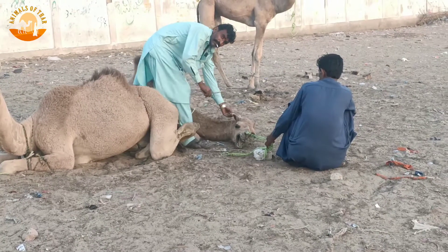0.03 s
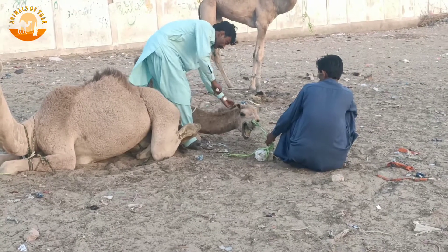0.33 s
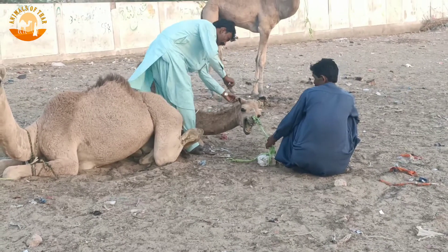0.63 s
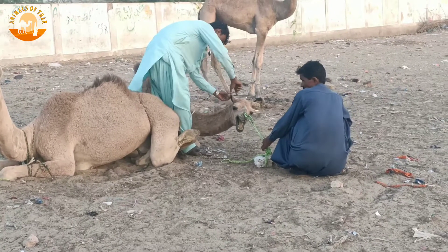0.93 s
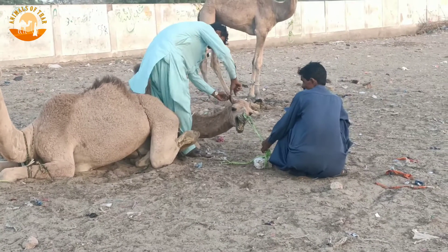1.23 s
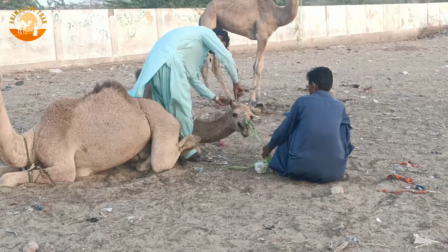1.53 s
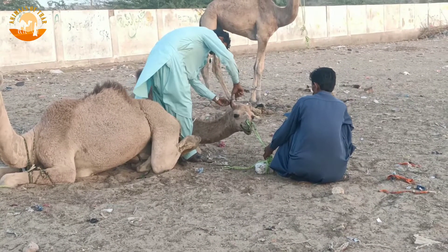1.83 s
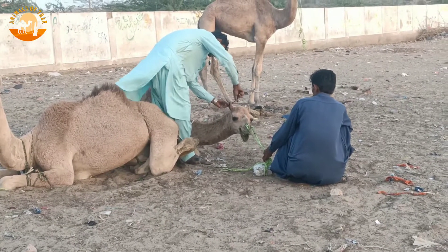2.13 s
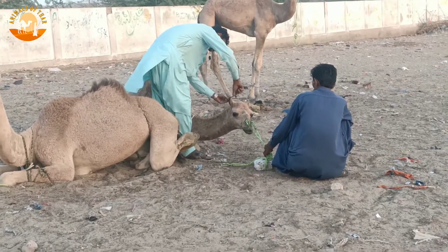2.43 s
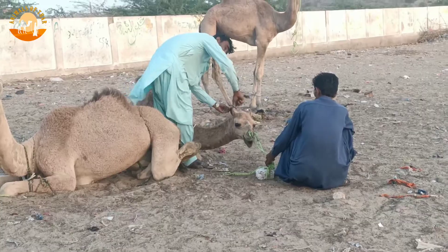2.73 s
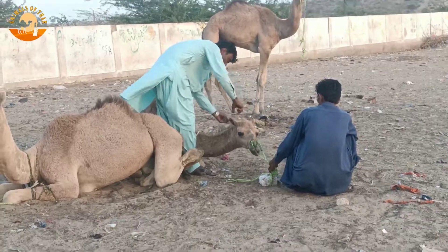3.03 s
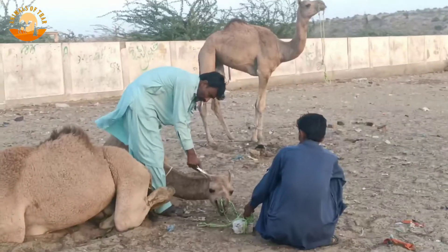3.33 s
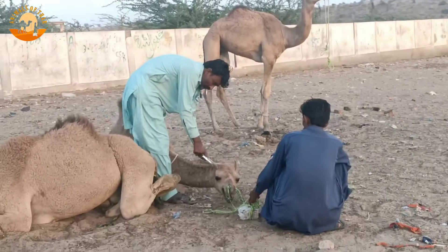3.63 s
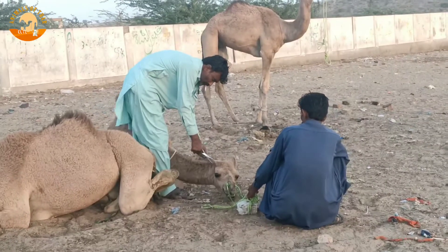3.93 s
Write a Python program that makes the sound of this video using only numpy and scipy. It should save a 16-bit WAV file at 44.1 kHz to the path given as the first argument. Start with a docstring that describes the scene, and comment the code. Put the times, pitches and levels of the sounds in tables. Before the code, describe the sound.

A camel gives one long, hoarse, wet bellow while wind rumbles on the microphone.

```python
"""A dusty yard, a camel held down near the microphone, wind buffeting it from start to finish.
The camel opens one long bellow: flaps of throat tissue drive a wet, ragged roar through the open mouth,
with saliva popping in it. The roar narrows to a groan, locks into an even flutter and roughens again.
A cut ends the bellow abruptly, with a sharp edit click. A faint rattle follows, then birds chirp far off.
Nearly all of the sound is in the right channel."""
import sys
import numpy as np
from scipy import signal
from scipy.fft import rfft, irfft
from scipy.io import wavfile
from scipy.ndimage import uniform_filter1d

SR = 44100
rng = np.random.default_rng(int(sys.argv[2]) if len(sys.argv) > 2 else 0)


def store_wav(level_fs):
    """Save 16-bit WAV to argv[1]."""
    pcm = np.round(np.clip(np.atleast_2d(level_fs), -1, 1) * 32767)
    wavfile.write(sys.argv[1], SR, pcm.T.astype(np.int16))


N = 176400
T = np.arange(N) / SR
START_S, ROAR_S, GROAN_S, LOCK_S, UNLOCK_S, CUT_S = 0.1546, 0.68, 1.68, 2.08, 2.89, 3.141
RING_MULTIPLE = 6   # cycles of the lowest throat ring per flap while locked


# The camel's throat, close by. Each row: time in seconds, flaps per second when not locked, timing
# scatter as a share of a period, strength scatter in dB, rasp from 0 to 1.
THROAT_FLUTTER = [(.15, 70, .35, 0.5, 0.8), (.4, 55.8, .3, 1.5, 0.68), (.9, 76, .25, 2, .9),
                  (1.3, 85, .22, 0.5, 1), (1.6, 74.4, .14, -1, 0.75), (2.0, 68, .22, 0.5, 0.5),
                  (2.11, 52, .014, 1, 0.6), (2.35, 53, 0.0079, 0, 0.5), (2.55, 53.7, .006, 2, 0.57),
                  (2.85, 57.7, .012, 1.5, 0.43), (2.93, 72, .22, -0.5, 0.56), (3.14, 81, 0.17, 1, 0.99)]
def bellow():
    """Flaps of the throat and their puffs of air excite the mouth, the nose and two throat rings."""
    rate, scatter, scatter_db, rasp = in_time(THROAT_FLUTTER)
    ring_hz = in_time(LOW_RING)[0]
    lock = ramp(LOCK_S, 0.08) * (1 - ramp(UNLOCK_S, 0.08))
    flaps = pulses(rate + lock * (ring_hz / RING_MULTIPLE - rate), scatter, scatter_db)
    turns = np.cumsum(ring_hz + 14 * scatter * drift(25)) / SR   # ragged flutter makes the ring waver
    buzz = rms_one(np.diff(np.floor(turns), prepend=0))
    wet = slaps()
    air = puffs(flaps, decay_s=0.0045) + from_db(-4) * rng.standard_normal(N)   # puffs and a steady leak
    drive = np.sqrt(1 - rasp) * rms_one(flaps) + np.sqrt(rasp) * air + from_db(-9) * buzz
    drive = drive / loudness(drive) + wet
    crackle = saliva_crackle()
    breathy = drive + from_db(-1.5) * rng.standard_normal(N)
    voice = nasal_notch(mouth(drive, breathy, crackle, spit=air + 2 * wet, lock=lock))
    voice += bark(breathy) + squeak(breathy) + nasal_swell(drive)
    voice += low_ring(breathy, turns, scatter) + second_ring(breathy) + lock * hum(turns)
    return voice * ramp(START_S, 0.01) * (1 - ramp(CUT_S, 0.00093))


# Throat and mouth in three postures. Each row: resonance in Hz, width in Hz, relative gain in dB.
GAPE_RESONANCES = [(545, 142, 11.5), (835, 114, 9.5), (1082, 203, 8.5), (1360, 330, 1), (1830, 140, -7),
                   (2130, 160, -10.5), (2630, 340, -11.5), (3200, 420, -14.5), (3780, 320, -13.5),
                   (4310, 270, -18.5), (5300, 110, -21.5), (6140, 420, -24), (7300, 810, -34.5)]
ROAR_RESONANCES = [(383, 53, 6), (687, 290, -3.5), (1014, 290, -6), (1335, 178, 2.5), (1572, 73, -3),
                   (2036, 350, 3), (2420, 174, -4), (2630, 430, -2.5), (3250, 232, 0), (3830, 176, -13),
                   (4310, 730, -25), (5460, 270, -21), (6240, 400, -24.5), (7060, 1250, -30.5)]
GROAN_RESONANCES = [(748, 112, 1), (940, 280, -13.5), (1356, 102, 2.5), (1571.7, 156, -8), (2100, 148, 1.5),
                    (2382, 134, -2), (2752, 254, -6.5), (3230, 214, -12), (3720, 110, -22),
                    (4220, 160, -19), (5176, 150, -30.5), (6120, 820, -38), (7105, 340, -30)]
# The camel's effort. Each row: time in seconds, relative dB of the lower and of the upper resonances.
BELLOW_EFFORT = [(0.14, -23.5, -79), (0.16, -39.5, -55.5), (0.2, -40, -59), (0.21, -30, -50.5),
                 (0.26, -32.5, -51), (0.45, -33, -51), (0.55, -34.5, -44.5), (0.64, -33, -42.5),
                 (0.79, -36.5, -43.5), (1.0, -32.5, -38.5), (1.26, -32, -38.5), (1.67, -34, -40),
                 (1.83, -42, -46.5), (1.85, -34, -37.5), (1.86, -38, -42.5), (1.94, -37, -41.5),
                 (2.15, -38, -46.5), (2.8, -36.5, -45), (3.13, -41.5, -47)]
def mouth(drive, breathy, crackle, spit, lock, split_hz=1750):
    """The mouth passes from gape to roar to groan; crackle and fine spit stop as it narrows."""
    lower_db, upper_db = in_time(BELLOW_EFFORT)
    roar, groan = ramp(ROAR_S, 0.32), ramp(GROAN_S, 0.16)
    gritty = drive + from_db(-8) * crackle * (1 - groan)
    postures = (GAPE_RESONANCES, 1 - roar), (ROAR_RESONANCES, roar * (1 - groan)), (GROAN_RESONANCES, groan)
    lower = upper = 0
    for rows, share in postures:
        lower += np.sqrt(share) * resonate(breathy, [r for r in rows if r[0] <= split_hz])
        upper += np.sqrt(share) * resonate(gritty, [r for r in rows if r[0] > split_hz])
    lower = from_db(lower_db - 2.5 - 5.5 * lock) * lower / loudness(lower)   # softer while locked
    upper = from_db(upper_db + 2) * upper / loudness(upper)
    sizzle = from_db(upper_db - 36) * (1 - groan) * band(spit, 8900, 16000)
    return lower + upper + sizzle


# The lowest throat resonance. Each row: time in seconds, centre in Hz, clean and rough levels in dB.
LOW_RING = [(.2, 289.8, -73, -49), (.72, 288.5, -43.5, -66), (.8, 287.5, -34, -43),
            (.93, 288.5, -34.5, -47.5), (1.0, 276.1, -37.5, -43), (1.12, 283.9, -36.5, -37),
            (1.17, 331.4, -37, -42.5), (1.23, 320.4, -32.5, -45), (1.42, 298.7, -31.5, -38.5),
            (1.66, 298.2, -34.5, -35), (1.77, 324.4, -65.5, -32), (1.95, 317.5, -35, -33.5),
            (2.09, 328.6, -28.5, -35.5), (2.16, 328.3, -33.5, -49), (2.33, 328.3, -30.5, -40),
            (2.48, 321.7, -26.5, -55.5), (2.66, 323.4, -27, -44), (2.86, 319.2, -28.5, -48),
            (2.93, 315.5, -39, -34.5), (3.14, 306.4, -40, -35)]
def low_ring(drive, turns, scatter):
    """The throat booms: a rough band around a clean tone that flickers as the flutter grows ragged."""
    _, clean_db, rough_db = in_time(LOW_RING)
    flicker_db = 3 * scatter * drift(32)
    clean = from_db(clean_db + flicker_db) * np.sqrt(2) * np.sin(2 * np.pi * turns)
    return clean + from_db(rough_db) * gliding(drive, turns, width_hz=83)


# The throat's second ring. Each row: time in seconds, centre in Hz, level in dB.
HIGH_RING = [(1.12, 710, -61), (1.25, 712, -35.5), (1.4, 706, -43.5), (1.52, 733, -41.5), (1.72, 738, -45),
             (1.85, 714, -41), (1.95, 698, -46.5), (2.03, 737, -43), (2.13, 760, -46), (2.85, 750, -63),
             (2.95, 758, -55), (3.14, 755, -45.5)]
def second_ring(drive):
    """A narrow throat resonance rings a little over an octave above the boom."""
    hz, db = in_time(HIGH_RING)
    return from_db(db) * gliding(drive, np.cumsum(hz) / SR, width_hz=30.6)


# The hum in the groan. Each row: multiple of the flutter rate, relative level in dB.
HUM_HARMONICS = [(4, -18.5), (5, -30), (7, -20.5), (8, -27), (9, -49), (10, -26), (11, -44), (12, -23),
                 (13, -23.5), (14, -25), (15, -42.5), (16, -22), (17, -31), (18, -25.5), (19, -30),
                 (21, -41), (22, -29), (23, -30.5), (24, -39), (25, -19.5), (26, -25.5), (27, -36),
                 (28, -27.5), (29, -37), (30, -42.5)]
def hum(turns):
    """Locked to the ring, the flutter gives clean harmonics on either side of it."""
    phases = rng.random(len(HUM_HARMONICS))
    tones = sum(from_db(db) * np.sin(2 * np.pi * (k * turns / RING_MULTIPLE + phase))
                for (k, db), phase in zip(HUM_HARMONICS, phases))
    return from_db(-42) * rms_one(tones)


# The opening bark. Each row: time in seconds, centre in Hz, level in dB.
BARK_GLIDE = [(.2, 2280, -53), (.213, 2070, -40), (.232, 2010, -41), (.245, 1900, -47), (.265, 1460, -51),
              (.3, 1454, -38.5), (.45, 1300, -62)]
def bark(drive):
    """A resonance falls as the jaw drops."""
    hz, db = in_time(BARK_GLIDE)
    return from_db(db) * gliding(drive, np.cumsum(hz) / SR, width_hz=330)


def squeak(drive, hz=4400, end_s=0.202):
    """The tight throat squeaks as the call starts."""
    return from_db(-58.5) * (1 - ramp(end_s, 0.018)) * gliding(drive, hz * T, width_hz=320)


# The notch cut by the nose. Each row: time in seconds, centre in Hz.
NASAL_NOTCH = [(.2, 1530), (.75, 1645), (1.62, 1650), (1.74, 1820), (3.14, 1830)]
def nasal_notch(voice, width_hz=130):
    """The nasal passage absorbs a narrow, moving band."""
    hz, = in_time(NASAL_NOTCH)
    carrier = np.exp(2j * np.pi * np.cumsum(hz) / SR)
    highpass = signal.butter(2, width_hz / 2, "high", fs=SR, output="sos")
    return (signal.sosfilt(highpass, signal.hilbert(voice) / carrier) * carrier).real


# The nose. Each row: resonance in Hz, width in Hz, relative gain in dB.
NASAL_RESONANCES = [(2150, 170, -3.5), (2396, 130, 1), (4380, 110, -19.5), (5214, 120, -22.5)]
def nasal_swell(drive, db_per_s=28.5):
    """Nasal resonances swell towards the end of the bellow."""
    nasal = resonate(drive, NASAL_RESONANCES)
    return from_db(-40 - db_per_s * np.abs(CUT_S - T)) * nasal / loudness(nasal)


# Hard wet slaps in the throat. Each row: start in seconds, relative strength in dB.
THROAT_SLAPS = [(0.231, -27), (.371, -40), (0.427, -27), (0.4648, -16.5), (0.477, -20), (0.5256, -14),
                (0.539, -18), (.565, -31), (0.611, -34), (.629, -31), (0.655, -35), (.694, -26),
                (0.821, -18.5), (0.8525, -22), (0.86, -20.5), (0.9525, -17.5), (0.9855, -19.5),
                (1.0246, -19), (1.079, -25), (1.1197, -23), (1.157, -23), (1.1901, -20), (1.231, -18.5),
                (1.267, -27), (1.6345, -35), (1.853, -29), (1.904, -24.5), (1.9291, -32), (1.9527, -26),
                (1.9787, -26), (2.042, -20.5), (2.938, -35), (2.984, -24), (3.059, -34)]
def slaps(rise_s=0.002, boost_db=29):
    """Loose wet tissue gives short swelling bursts of noise."""
    swell = np.zeros(N)
    for s, db in THROAT_SLAPS:
        age = np.maximum(T - s, 0) / rise_s
        swell += from_db(db + boost_db) * age * np.exp(1 - np.minimum(age, 50))
    return swell * rng.standard_normal(N)


def saliva_crackle(ticks_per_s=200, scatter_db=2.5):
    """Saliva ticks at random, a few ticks louder than the rest."""
    ticks = rng.random(N) < ticks_per_s / SR
    return rms_one(ticks * from_db(scatter_db * np.minimum(rng.exponential(1, N), 4)))


# Saliva bubbles, heard from close by. Each row: time of the peak in seconds, pitch in Hz, level in dB.
SALIVA_POPS = [(.235, 3500, -33.5), (.275, 3650, -44), (.336, 3700, -47), (.354, 3640, -41),
               (0.375, 3650, -36), (0.429, 3830, -35), (.450, 3840, -37), (0.489, 3640, -35.5),
               (0.507, 3290, -32), (0.544, 3600, -39), (.568, 3600, -34), (0.612, 3370, -41),
               (.655, 3150, -36), (.670, 3480, -39), (.697, 3040, -38), (0.716, 3340, -38),
               (.823, 3450, -33.5), (.842, 3230, -37), (.856, 3090, -29), (.889, 3180, -39),
               (0.958, 3230, -32), (1.028, 3230, -28.5), (1.079, 3300, -34), (1.122, 3420, -37),
               (1.161, 3198, -32), (1.195, 3230, -31), (1.236, 3320, -33), (1.323, 3200, -30.5),
               (1.41, 3250, -38), (1.538, 3300, -31.5), (1.604, 3200, -33), (1.636, 3170, -25),
               (1.647, 3250, -32.5), (1.656, 3200, -26), (1.668, 3110, -30.5)]
def saliva_pops(swell_s=0.0019, burst_s=0.0012, rise_hz_per_s=33000):
    """Each bubble gives a few milliseconds of rough, rising tone that swells, then bursts."""
    out, age = np.zeros(N), np.arange(-400, 400) / SR
    swell = np.exp(-(age / np.where(age < 0, swell_s, burst_s)) ** 2 / 2)
    blur = np.cumsum(260 * drift(297)) / SR
    for s, hz, db in SALIVA_POPS:
        span = int(s * SR) - len(age) // 2 + np.arange(len(age))
        turns = (hz + rise_hz_per_s * age / 2) * age + blur[span]
        out[span] += from_db(db) * swell * np.sin(2 * np.pi * turns)
    return out


# The camel's closing rattle. Each row: resonance at mid-rattle in Hz, width in Hz, relative gain in dB.
RATTLE_RESONANCES = [(970, 303, 9.5), (1390, 200, 0), (2073, 200, -0.5), (2710, 380, 2.5), (3410, 380, 3.5),
                     (3815, 425, -8.5), (6565, 300, -14)]
def rattle(start_s=3.153, end_s=3.385, flaps_per_s=90, fall_per_s=0.5, fade_db_per_s=29):
    """Faint airy flaps grow more even as they fade, slow down and sink in pitch."""
    ragged = np.interp(T, [start_s, end_s], [1.5, 0.3])
    flaps = pulses(np.full(N, flaps_per_s), scatter=0.12 * ragged, scatter_db=2 * ragged)
    drive = rms_one(flaps) + 1.6 * puffs(flaps, decay_s=0.0018)
    sound = rms_one(resonate(drive, RATTLE_RESONANCES))
    slowing_time = T - fall_per_s * (T - (start_s + end_s) / 2) ** 2 / 2
    fade = from_db(-44 - fade_db_per_s * np.maximum(T - start_s, 0))
    return np.interp(slowing_time, T, sound) * fade * ramp(start_s, 0.01) * (1 - ramp(end_s, 0.013))


def edit_click():
    """A sharp edit click where the cut ends the bellow."""
    return from_db(-27) * band(signal.unit_impulse(N, int(CUT_S * SR)), 2500, 15000)


# Gusts on the microphone. Each row: time in seconds, level in dB.
GUST_LEVELS = [(0.0, -13.5), (0.01, -31.5), (0.21, -27), (0.23, -35), (0.49, -29.5), (0.56, -39),
               (0.67, -35), (0.7, -29), (1.1, -47.5), (1.21, -31), (1.34, -45.5), (1.37, -33), (1.4, -43),
               (1.6, -50), (1.66, -36.5), (1.7, -51), (2.27, -46), (2.55, -48), (2.58, -37), (2.73, -50.5),
               (2.83, -36), (3.12, -33), (3.15, -28), (3.31, -30.5), (3.35, -29), (3.46, -31),
               (3.53, -28.5), (3.6, -31.5), (3.65, -26), (3.7, -30), (3.73, -27), (3.94, -33.5),
               (3.98, -28), (4.0, -32.5)]
# Their rumble. Each row: frequency in Hz, relative spectral density in dB.
WIND_SPECTRUM = [(20, -13), (40, -1), (65, 0), (120, 3), (220, 0.5), (320, -2.5), (450, -14.5),
                 (700, -33.5), (1000, -42.5), (1600, -45.5), (3000, -51.5)]
# The rumble below 80 Hz. Each row: time in seconds, level in dB against the rest of the wind.
DEEP_RUMBLE_LEVELS = [(0, 1), (.75, 4), (1.3, 0.5), (2.0, 4), (2.7, 0.5), (3.3, -2), (4, -7)]
def wind(lumps_per_s=29, lump_db=2, pivot_hz=72):
    """Air over the microphone makes a lumpy rumble that brightens as the gust grows."""
    gust_db, = in_time(GUST_LEVELS)
    deep_db, = in_time(DEEP_RUMBLE_LEVELS)
    edges = 16 * 2 ** np.arange(0, 8, 0.5)   # half-octave bands
    shared_lumps = drift(lumps_per_s)
    white = rng.standard_normal((2, N))
    rumble = plain = 0
    for k, (low, high) in enumerate(zip(edges, edges[1:])):
        hz = np.sqrt(low * high)
        lumps = shared_lumps + 1.08 * drift(lumps_per_s)
        part = band(white[k % 2], low, high) * from_db(at_hz(WIND_SPECTRUM, hz) + lump_db * lumps)
        tilt_db = 0.35 * (gust_db + 30) * np.clip(np.log2(hz / pivot_hz), -1.2, 1.8)
        plain += part
        rumble += part * from_db(tilt_db + deep_db * (hz < 80))
    return from_db(gust_db + 2.5) * band(rumble, 10, 1000) / loudness(plain)


# Single buffets, right on the microphone. Each row: time in seconds, level in dB.
WIND_BUFFETS = [(0.159, -12), (0.205, -13.5), (.704, -20), (3.159, -16), (3.256, -21), (3.347, -13.5)]
def buffets(hz=197, width_s=0.0017):
    """Each knock of air is a low thump about one cycle long."""
    out = np.zeros(N)
    for s, db in WIND_BUFFETS:
        swell = np.exp(-np.minimum(((T - s - width_s) / width_s) ** 2 / 2, 50))
        out += from_db(db) * swell * np.cos(2 * np.pi * hz * (T - s - width_s / 2))
    return out


# Short blusters on the microphone. Each row: start in seconds, length in seconds, level in dB.
WIND_BLUSTERS = [(0.047, 0.017, -35), (0.086, 0.09, -25.5), (0.701, 0.09, -30), (3.381, 0.077, -31.5),
                 (3.482, 0.0077, -33), (3.513, 0.014, -30), (3.622, 0.067, -28), (3.75, 0.026, -37),
                 (3.813, 0.012, -44), (3.845, 0.022, -39), (3.907, 0.04, -37.5)]
# Their rougher colour. Each row: frequency in Hz, relative spectral density in dB.
BLUSTER_SPECTRUM = [(60, -23), (180, 3), (300, 0.5), (450, 0), (700, -9), (1100, -27.5), (2000, -47),
                    (4000, -76)]
def blusters():
    """Brief rushes of air hit the microphone sharply and die away."""
    level = sum(from_db(db) * ramp(s, 0.003) * (1 - ramp(s + length, length))
                for s, length, db in WIND_BLUSTERS)
    return noise(BLUSTER_SPECTRUM) * level


# Birds far from the microphone. Each row: time of the peak in seconds, half-length in seconds,
# pitch in Hz, glide in Hz per second, level in dB.
BIRD_CHIRPS = [(3.393, 0.02, 6480, -6000, -68), (3.478, .03, 6300, 4000, -70),
               (3.563, 0.019, 6250, 3996, -64), (3.61, .03, 6800, 5996, -69),
               (3.615, 0.043, 3770, -3000, -68), (3.667, 0.02, 5900, -22000, -69),
               (3.683, 0.036, 6450, 4003, -68), (3.774, 0.027, 6250, 1, -70),
               (3.796, 0.033, 3650, -3000, -64), (3.843, .02, 6300, 14000, -69)]
def birds(blur_hz=175):
    """Short gliding chirps, blurred by distance."""
    out, blur = np.zeros(N), np.cumsum(blur_hz * drift(119.6)) / SR
    for s, half_s, hz, glide, db in BIRD_CHIRPS:
        span = np.abs(T - s) < half_s
        age = T[span] - s
        turns = (hz + glide * age / 2) * age + blur[span]
        out[span] += from_db(db) * np.cos(np.pi * age / half_s / 2) ** 2 * np.sin(2 * np.pi * turns)
    return out


# The hiss behind the yard's sounds. Each row: frequency in Hz, relative spectral density in dB.
HISS_SPECTRUM = [(100, -6), (700, 1), (1500, -3.5), (2500, -2.5), (3700, 8), (5000, -5.5), (6400, -0.5),
                 (8200, -11.5), (12000, -13), (15000, -12.5)]
def hiss():
    """A faint, steady background hiss."""
    return from_db(-65.5) * noise(HISS_SPECTRUM)


# The microphone's nearly dead left channel. Each row: frequency in Hz, relative noise density in dB.
LEFT_SPECTRUM = [(20, 30.5), (60, 18.5), (150, 7), (500, 0), (2000, -0.5), (6000, -13.5), (15000, -11)]
def left_channel(yard, smear_s=0.02):
    """A faint, smeared spill of the yard and the channel's own noise."""
    smear = rng.standard_normal(N) * np.exp(-np.minimum(T / smear_s, 50))
    spill = signal.fftconvolve(yard, smear / np.linalg.norm(smear))[:N]
    return from_db(-41) * spill + from_db(-57.5) * noise(LEFT_SPECTRUM)


def pulses(rate, scatter, scatter_db):
    """One click per flap, scattered in time and strength."""
    at = np.flatnonzero(np.diff(np.floor(np.cumsum(rate) / SR)))
    late, strong = np.clip(rng.standard_normal((600, 2))[:len(at)].T, -2, 2)
    landing = np.clip(at + late * scatter[at] * SR / rate[at], 0, N - 1).astype(int)
    out = np.zeros(N)
    out[landing] = from_db(strong * scatter_db[at])
    return out


def puffs(flaps, decay_s):
    """Each flap lets out a dying puff of air."""
    level = signal.lfilter([1], [1, -np.exp(-1 / (decay_s * SR))], flaps + 1e-18)
    return rms_one(level * rng.standard_normal(N))


def resonate(x, rows):
    """Resonances in parallel, alternating in sign."""
    return sum(from_db(db) * band(x, hz - width / 2, hz + width / 2) * (-1) ** k
               for k, (hz, width, db) in enumerate(rows))


def gliding(x, turns, width_hz):
    """A resonance that follows a phase given in turns, level evened."""
    carrier = np.exp(2j * np.pi * turns)
    lowpass = signal.butter(2, width_hz / 2, fs=SR, output="sos")
    out = (signal.sosfilt(lowpass, x / carrier) * carrier).real
    return out / loudness(out)


def band(x, low, high):
    """Band-pass between two frequencies in Hz."""
    return signal.sosfilt(signal.butter(2, [low, high], "band", fs=SR, output="sos"), x + 1e-18)


def noise(spectrum):
    """Steady coloured noise, rms 1."""
    gain = from_db(at_hz(spectrum, np.fft.rfftfreq(N, 1 / SR)))
    return rms_one(irfft(rfft(rng.standard_normal(N)) * gain, N))


def drift(hz):
    """Smooth random wander, rms about 1."""
    pole = np.exp(-80 * np.pi * hz / SR)   # one step every 40 samples
    slow = signal.lfilter([1], [1, -2 * pole, pole * pole], rng.standard_normal(N // 40 + 2002))[2000:]
    return np.interp(np.arange(N) / 40, np.arange(len(slow)), rms_one(slow))


def loudness(x, window_s=0.064):
    """Running rms."""
    size = int(window_s * SR / 2)
    return np.sqrt(np.abs(uniform_filter1d(uniform_filter1d(x ** 2, size), 2 * size)) + 1e-12)


def in_time(rows):
    """Columns of a curve, sample by sample."""
    s, *columns = np.transpose(rows)
    return [np.interp(T, s, c) for c in columns]


def at_hz(points, hz):
    """Read a spectrum on a log-frequency axis."""
    f, db = np.transpose(points)
    return np.interp(np.log(hz + 1e-9), np.log(f), db)


def ramp(s, length):
    """Rise from 0 to 1 over length seconds, centred on s."""
    return np.clip((T - s) / length + 0.5, 0, 1)


def rms_one(x):
    """Scale to rms 1."""
    return x / np.sqrt(np.mean(x ** 2) + 1e-20)


def from_db(db):
    """Decibels to gain."""
    return 10 ** (np.asarray(db) / 20)


def scene(right_db=5.5):
    """Camel, wind and birds reach the right channel; the left holds only a trace and its own noise."""
    camel = bellow() + saliva_pops() + rattle()
    yard = camel + wind() + buffets() + blusters() + birds() + hiss()
    mix = yard + edit_click()
    return np.array([left_channel(mix), from_db(right_db) * mix])


def record(dry):
    """The treble is cut steeply above 15.5 kHz."""
    return signal.sosfilt(signal.ellip(10, 0.1, 80, 15500, fs=SR, output="sos"), dry)


dry = scene()
out = record(dry)
store_wav(out)
```